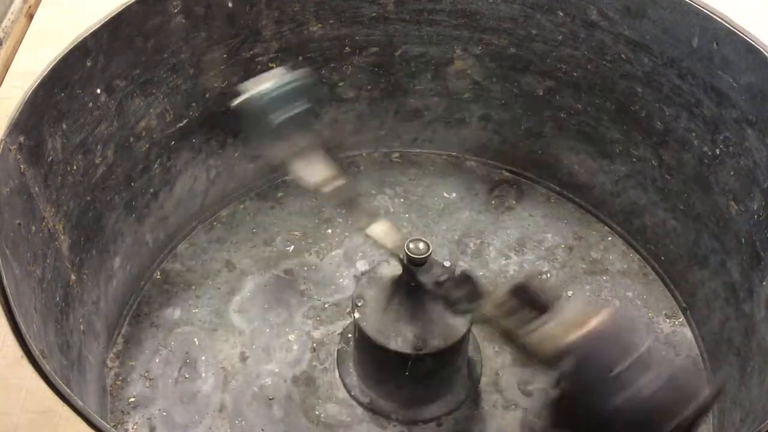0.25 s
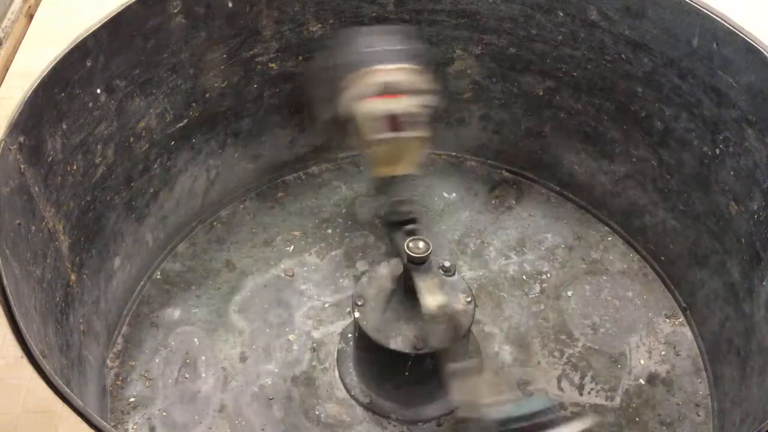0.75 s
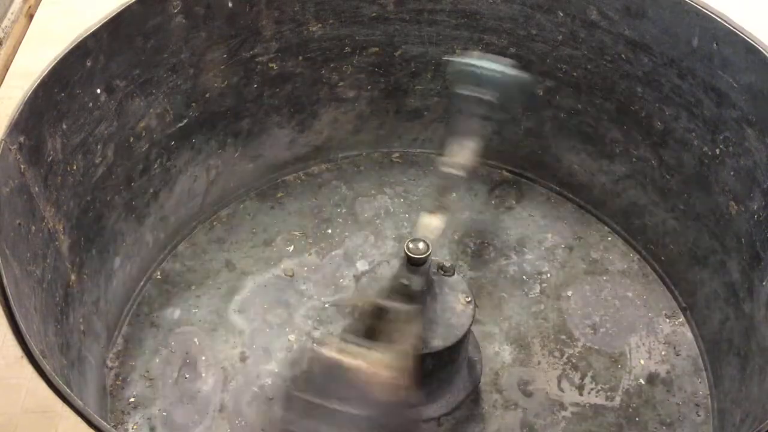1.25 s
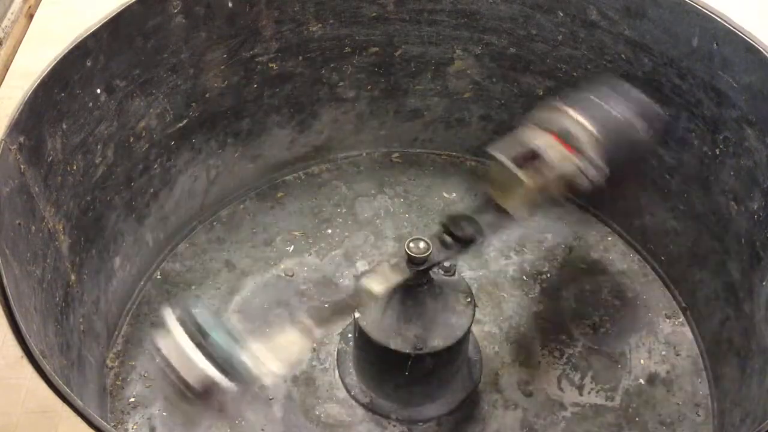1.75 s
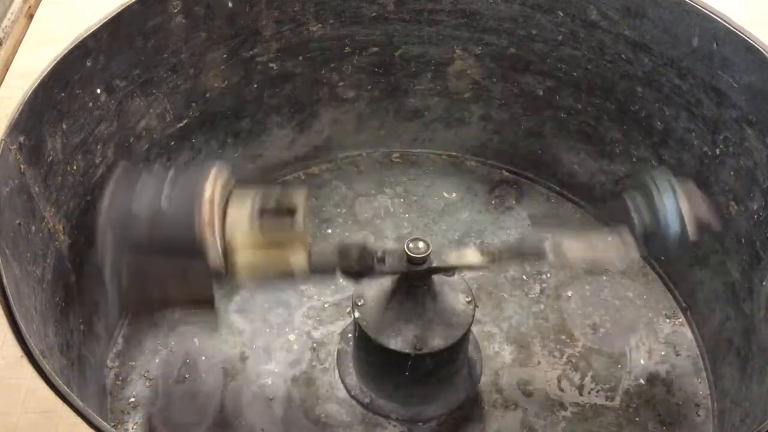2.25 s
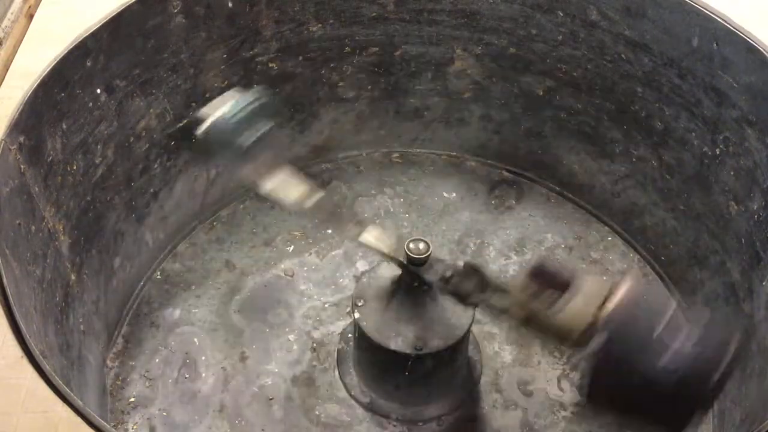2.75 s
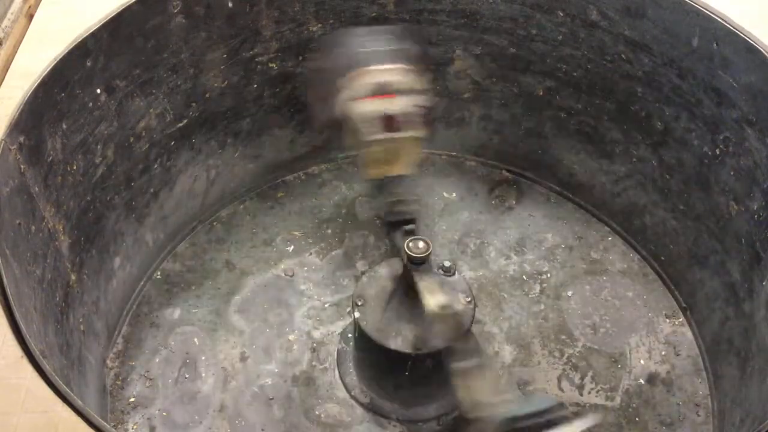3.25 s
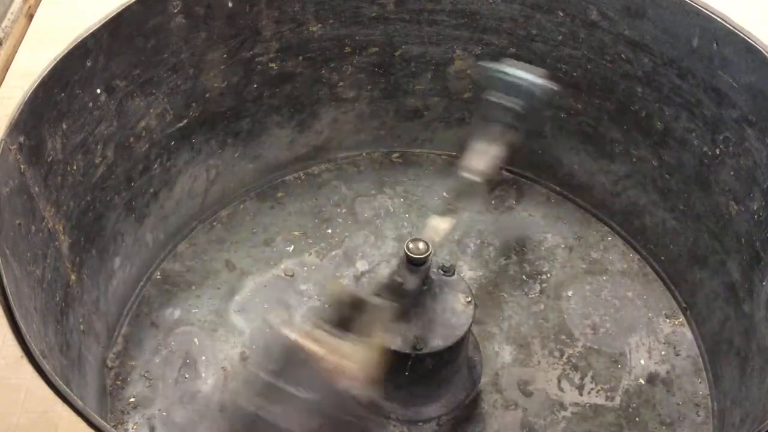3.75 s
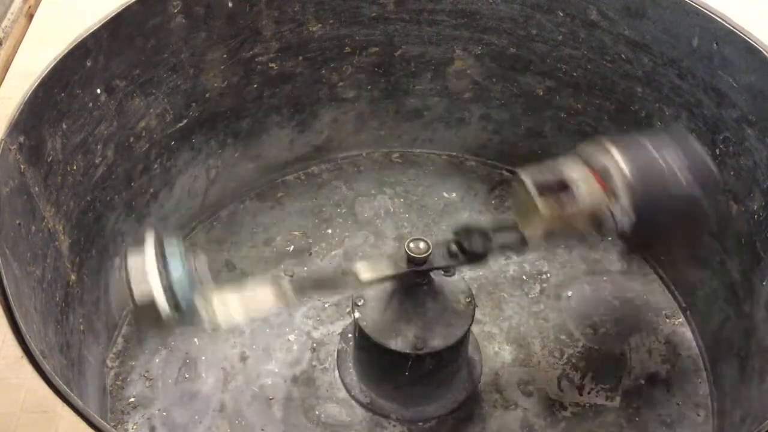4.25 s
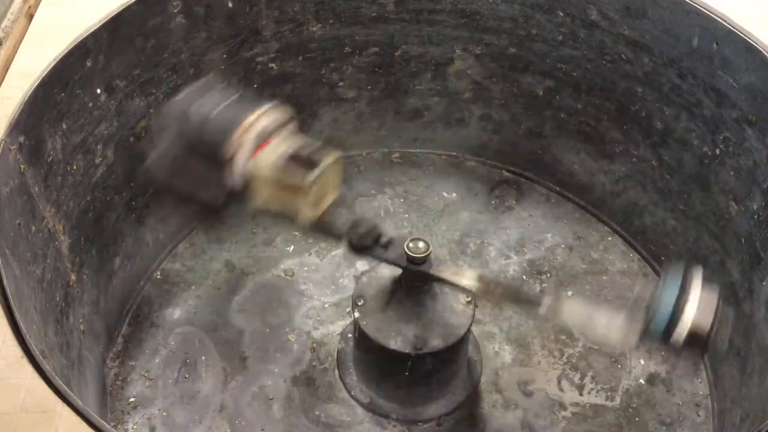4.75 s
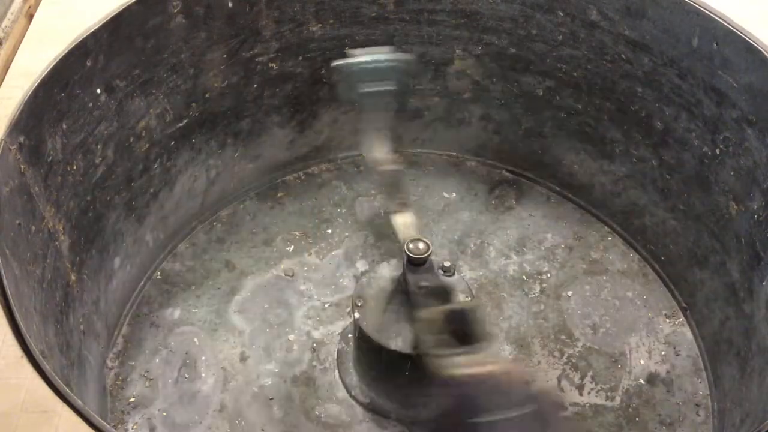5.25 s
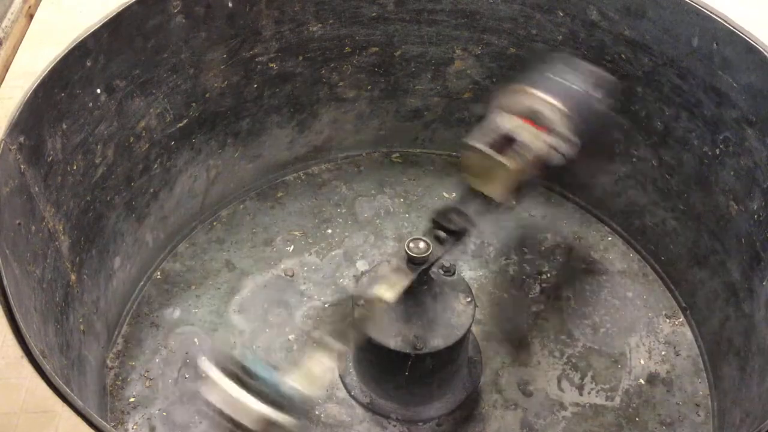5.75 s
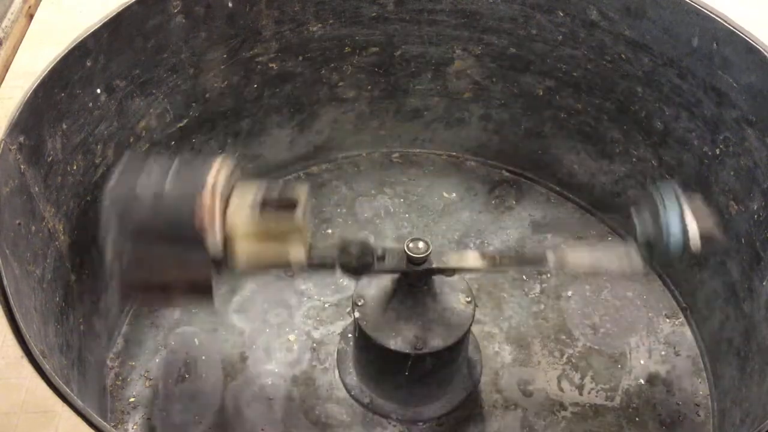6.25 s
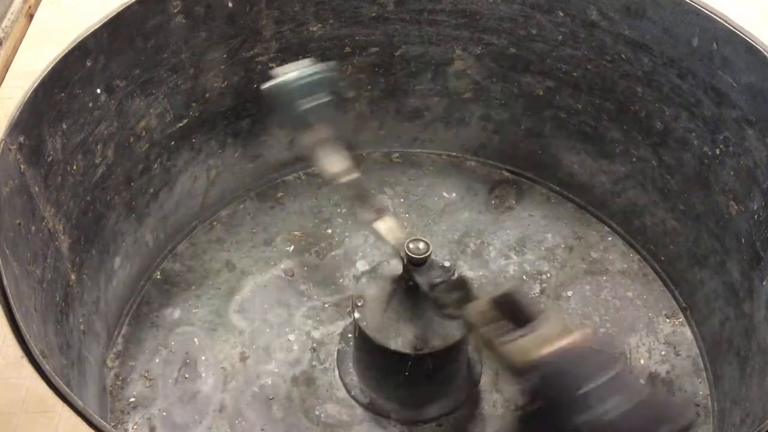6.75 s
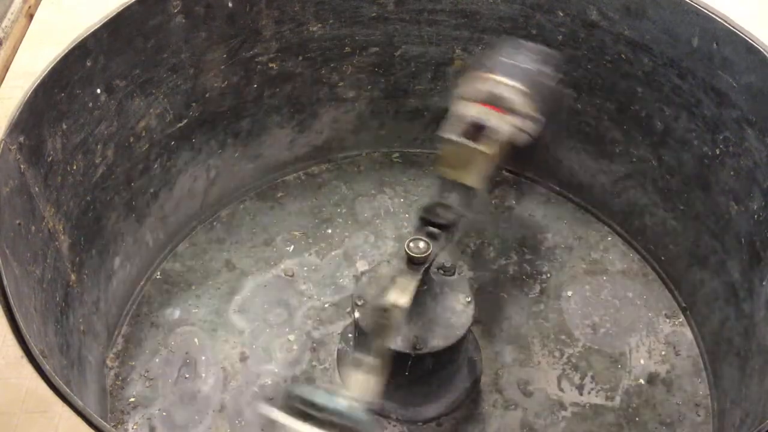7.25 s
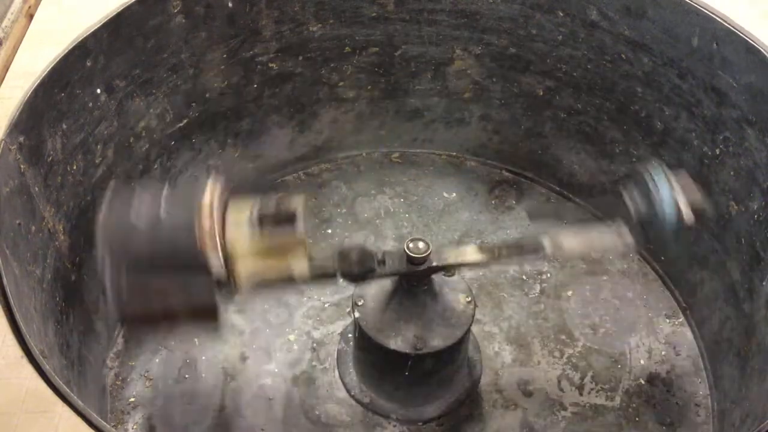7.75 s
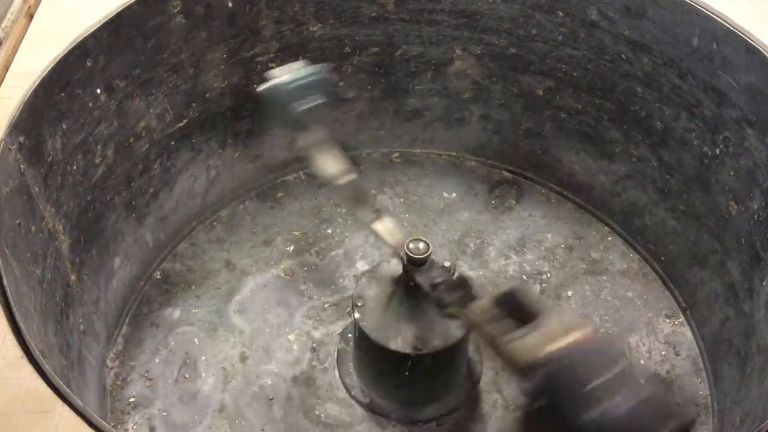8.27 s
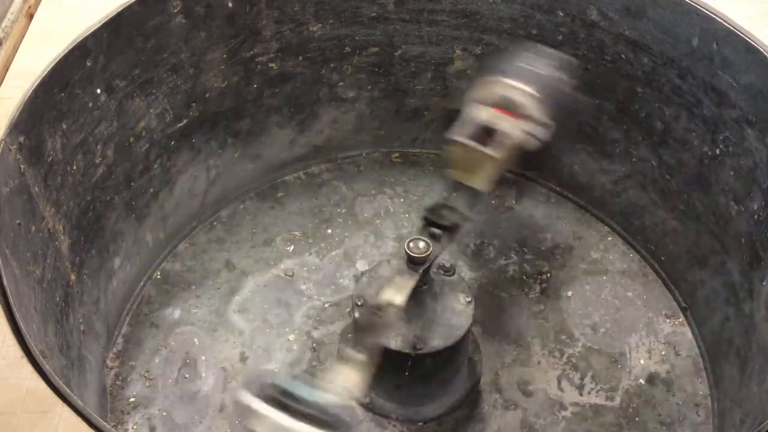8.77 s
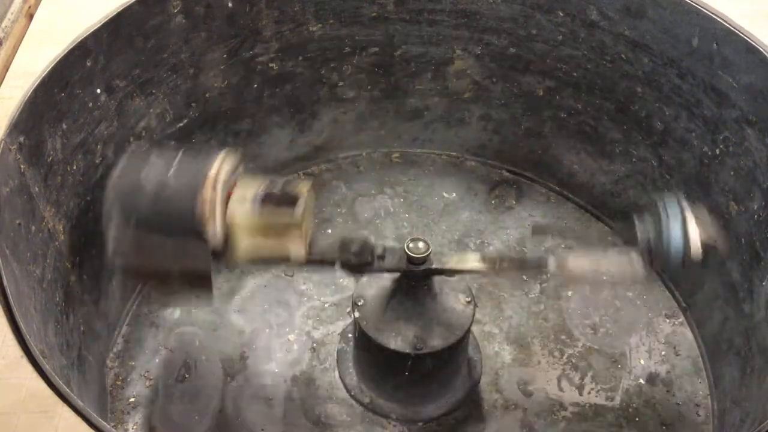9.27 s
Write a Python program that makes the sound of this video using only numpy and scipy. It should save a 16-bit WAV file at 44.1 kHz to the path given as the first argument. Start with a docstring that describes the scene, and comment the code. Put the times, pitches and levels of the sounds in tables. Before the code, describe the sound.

A steady low extractor-fan rumble with airy rush fills a workshop while a spinning metal arm gives faint, crisp double ticks about three times a second.

```python
"""The arm of a centrifugal casting machine coasts round inside a steel drum, slowing from about 3.4 to 2.6 turns
a second; on every turn its loose joint ticks: filtered noise bursts, decaying arm modes and a short drum wash.
Across the workshop an extractor fan rumbles, rushes and hums: shaped noise, narrow noise bands and sine lines.
Small metal parts ping now and then as decaying sines, over a scatter of faint short treble tones; soft swells
of grainy treble noise come and go. Everything reaches one microphone, with a faint hiss."""
import sys
import numpy as np
from scipy import signal
from scipy.fft import rfft, irfft, next_fast_len
from scipy.io import wavfile
from scipy.ndimage import uniform_filter1d, map_coordinates

SR = 44100
rng = np.random.default_rng(int(sys.argv[2]) if len(sys.argv) > 2 else 0)


def pcm_store(signal):
    """Save signal as 16-bit PCM."""
    levels = np.round(np.clip(np.atleast_2d(signal), -1, 1) * 32767)
    wavfile.write(sys.argv[1], SR, levels.astype(np.int16).T)


N = 419391  # samples

# Extractor rumble spectrum: (frequency [Hz], relative density [dB per Hz])
RUMBLE_SPECTRUM = [(13, -56), (22, -26), (80, -5), (96, -1.5), (108, 0.5), (119, 2), (130, -2), (152, -9.5),
                   (166, -12), (212, -15), (229, -20.5), (248, -15), (270, -19.5), (326, -23.5),
                   (343, -28.5), (365, -22), (392, -28.5), (410, -29.5), (476, -26.5), (560, -43.5),
                   (730, -68.5), (1230, -120)]
# Slow level curve of the rumble noise, uneven by a few dB: (time [s], rms level [dB])
RUMBLE_LEVEL = [(0, -34.5), (.7, -32.5), (1.3, -32), (2.2, -34.5), (2.9, -32), (3.4, -32), (4.2, -32),
                (4.7, -34), (5.2, -33.5), (5.7, -33), (6.2, -32.5), (7.5, -33.5), (8.5, -32.5), (9.5, -35)]
# Extractor air rush spectrum: (frequency [Hz], relative density [dB per Hz])
RUSH_SPECTRUM = [(320, -34.5), (540, -5.5), (616, -0.5), (812, -4), (957, -4), (1080, -7), (1410, -3),
                 (1590, -9.5), (1750, -8.5), (1920, -12.5), (2140, -12.5), (2330, -14.5), (2550, -16),
                 (2910, -19), (4500, -29), (7500, -41), (9750, -68.5), (16500, -120)]
RUSH_DB = -56  # rms
# Narrow noise bands that give the rush a wavering, tonal grain:
# (frequency [Hz], width of one pass [Hz], rms level [dB])
TONAL_BANDS = [(96.6, 5.2, -45), (202.3, 21, -52), (286, 8.4, -61.5), (330.5, 8, -67), (433, 17, -66.5),
               (477.7, 16, -65.5), (513.5, 14, -72.5), (602, 6, -70), (620.8, 14, -69.5), (658, 8.4, -73),
               (757.5, 28, -71.5), (913, 11, -72), (972, 28, -70.5), (1045, 18, -70.5), (1149, 64, -69.5),
               (1396, 33, -76), (1480, 110, -76), (1720, 170, -77), (2034, 46, -79), (2140, 28, -78.5),
               (2488, 55, -78.5), (2630, 40, -82), (3220, 380, -84)]
DRIFT_S = .004  # spread of the time wander that makes these bands waver in pitch
# Motor lines, shaft orders and mains hum: (frequency [Hz], rms level before HUM_TRIM_DB [dB])
HUM_LINES = [(34, -62.5), (68, -49.5), (120, -44.5), (240, -52), (360, -60), (480, -74), (877.1, -74.5)]
HUM_TRIM_DB = -0.5

# Microphone hiss spectrum: (frequency [Hz], relative density [dB per Hz])
HISS_SPECTRUM = [(3820, -30), (6500, -5), (7690, -3.5), (9240, -1), (12600, -7.5), (14500, -7.5),
                 (15600, -19)]
HISS_DB = -87  # rms
TOP_HZ = 15680  # upper limit of the recorder

# The joint clicks twice on each turn, a duller click and then a brighter one:
# (time [s], nominal peak [dB], gap to second [s], second nominal peak [dB], knock relative to click [dB])
TURN_CLICKS = [(0.187, -64, .012, -70, -14), (0.4748, -63, .014, -66, -7), (0.7662, -66, .019, -63, -7),
               (1.065, -64.5, 0.022, -67, -2), (1.3734, -67, .015, -65, -14),
               (1.6794, -69, 0.011, -64, -13.5), (1.9854, -67, .020, -64, -6),
               (2.2942, -65, 0.024, -64, -3), (2.6204, -67, 0.013, -71, -13),
               (2.9377, -65.5, .014, -67, -9), (3.2525, -67.5, 0.021, -66, 1),
               (3.5733, -68, 0.021, -65, -5), (3.9114, -66, .011, -68, -11), (4.2438, -65, .013, -68, -12),
               (4.573, -67, .016, -72, -5.5), (4.9092, -64, 0.021, -64, -4), (5.253, -69, 0.017, -64, -8),
               (5.6077, -65, .013, -65, -10), (5.9474, -67, 0.018, -70, 0), (6.3011, -68, 0.026, -67, -3),
               (6.6363, -65, .038, -67, -9), (7.0354, -64, .012, -68, -14), (7.3971, -66, 0.02, -64, -5),
               (7.7677, -66.5, 0.02, -64, -11), (8.153, -59.5, 0.018, -57, 7.5),
               (8.5395, -66, .012, -72, -10), (8.9171, -67, 0.018, -64, -4.5),
               (9.3097, -64, 0.025, -64, -7)]
FIRST_HZ, SECOND_HZ = 12300, 14600  # bright centres; the first is scattered by up to an eighth
SECOND_KNOCK_DB = -3  # the second knock relative to the first
# A faint third click after some turns; its delay is scattered by half either way
REBOUND_S, REBOUND_DB, REBOUND_KNOCK_DB, REBOUND_CHANCE = .06, -72, -14.5, .25
# Extra knocks, some on a turn's tick and some between turns:
# (time [s], nominal peak [dB], knock relative to click [dB], bright centre [Hz])
EXTRA_KNOCKS = [(1.1258, -65, -11, 11500), (1.3475, -54.5, -17, 14600), (2.147, -76, -8, 12000),
                (2.179, -64.5, 4, 9000), (2.186, -69, 3, 11500), (3.315, -70, -8, 8800),
                (4.99, -71, -7, 9700), (8.171, -55, -12, 9200)]
# Modes of the arm and its cradle: (frequency [Hz], relative level [dB], t60 [s])
ARM_MODES = [(3960, -3.5, .07), (4380, 0, 0.072), (4830, 0, 0.07), (5200, -1.5, .04), (5570, -2, .05),
             (6200, -3, .14), (6900, -5.5, .04), (7960, -6, .05), (9000, -5, .12), (9400, -8, .05),
             (10300, -8, .04), (11000, -9, .05)]
CLICK_T60_S, TAIL_T60_S, TAIL_DB = .03, .22, -14.5  # a short core, then a faint noisy tail
LEAD_IN_S, LEAD_IN_DB = .005, -13.5  # a short soft rise of noise before each click
BODY_DB, BODY_LOW_HZ = -7, 5500  # a broad crack under the bright scrape, relative to it
GRIT_MODES = 10  # small bright modes per blow
WASH_DB = -60.5

# Small metal pings: (time [s], level before rise and damping [dB], frequency [Hz], t60 before damping [s])
METAL_PINGS = [(.238, -77, 11600, .1), (1.887, -67, 6220, 0.084), (2.06, -77, 4250, .25),
               (2.84, -77, 12900, .12), (3.964, -69, 11571, 0.5), (3.968, -83, 10700, .3),
               (3.975, -81, 9000, .12), (3.993, -80, 12890, .4), (3.992, -80, 12400, .04),
               (4.003, -76, 12350, .04), (3.993, -86, 13900, .2), (1.135, -85, 13200, .2),
               (2.99, -83, 11400, .15), (3.0, -84, 10400, .12), (4.003, -67, 12800, .08),
               (6.637, -66, 11700, .07), (6.638, -75, 14300, .06), (6.639, -76, 12700, .06),
               (7.494, -79, 8900, .08)]
DAMPED_AT = .3  # share of its t60 after which a pinging part settles and is damped

# Soft treble noise swells, two of them trailing hard ticks: (time of the top [s], level [dB], spread [s])
TREBLE_SWELLS = [(3.02, -83, .07), (3.3, -85, 0.043), (3.55, -89, .1), (5.45, -81, 0.031),
                 (5.97, -79.5, 0.042), (6.13, -81, .03), (7.28, -87, .04), (8.21, -85, .03),
                 (3.3, -89.5, .3), (5.8, -89, .3), (6.68, -83, .025)]
GRAINS_PER_S, GRAIN_T60_S, GRAIN_SCATTER_DB = 1500, .006, 3.


def undb(db):
    """Decibels to gain."""
    return 10 ** (np.asarray(db) / 20)


def level(x, db):
    """Scale to an rms level."""
    return x * undb(db) / np.sqrt(np.mean(x ** 2))


def shaped(gain):
    """Noise of rms 1, white noise weighted by gain(Hz)."""
    size = next_fast_len(N)
    hz = np.arange(1, size // 2 + 2) * SR / size
    spectrum = rfft(rng.standard_normal(size)) * gain(hz)
    return level(irfft(spectrum, size)[:N], 0)


def coloured(points):
    """Noise of rms 1 through a (Hz, dB) table, practically silent outside it."""
    f, db = np.transpose(points)
    return shaped(lambda hz: undb(np.interp(np.log(hz), np.log(f), db, -200, -200)))


def resonant(centre_hz, width_hz):
    """Noise of rms 1 through a resonance applied twice."""
    return shaped(lambda hz: 1 / (1 + ((hz - centre_hz ** 2 / hz) / width_hz) ** 2))


def walk(rate):
    """Random levels held 1 / rate s and slewed twice; spread 1."""
    k = int(SR / rate)
    steps = np.repeat(rng.standard_normal(N // k + 1), k)
    x = uniform_filter1d(uniform_filter1d(steps, k), k)[:N]
    return x / x.std()


def add(out, s, x):
    """Mix x into out from s seconds on."""
    i = int(s * SR)
    out[i:i + len(x)] += x[:N - i]


def decay(t60, rise_s):
    """Envelope with a short rise and an exponential fall of 60 dB in t60 s."""
    t = np.arange(int(max(t60, .01) * SR)) / SR
    return (1 - np.exp(-t / rise_s)) * np.exp(-np.log(1000) * t / t60)


def ring(hz, t60, rise_s):
    """One decaying mode."""
    env = decay(t60, rise_s)
    return np.sqrt(2) * env * np.sin(2 * np.pi * hz * np.arange(len(env)) / SR)


def flutter(x, depth_db, rate):
    """Third-octave bands swell and sink independently; the outermost take in all beyond them."""
    size = next_fast_len(N)
    hz = np.arange(1, size // 2 + 2) * SR / size
    spectrum = rfft(x, size)
    band = np.clip(np.round(3 * np.log2(hz / 1000)), -3, 9)
    return sum(irfft(spectrum * (band == k), size)[:N] * undb(depth_db * walk(rate)) for k in np.unique(band))


def extractor(t):
    """Rumble and air rush as shaped noise, a tonal grain of narrow bands and slightly unsteady motor lines."""
    rumble_db = np.interp(t, *np.transpose(RUMBLE_LEVEL))
    rumble = coloured(RUMBLE_SPECTRUM) * undb(rumble_db + 0.82 * walk(5))
    slow_rush = flutter(coloured(RUSH_SPECTRUM), .6, 8)
    rush = level(flutter(slow_rush, 1.49, 30), RUSH_DB)
    grain = sum(undb(db + 1.5 * walk(5)) * resonant(hz, width) for hz, width, db in TONAL_BANDS)
    # reading the bands at wandering times bends their pitch
    grain = map_coordinates(grain, [(t + DRIFT_S * walk(1.5)) * SR], order=1, mode="mirror")
    hum = np.zeros(N)
    for hz, db in HUM_LINES:
        gain = undb(db + HUM_TRIM_DB + 1.6 * walk(6))
        hum += gain * np.sqrt(2) * np.sin(2 * np.pi * hz * t + .5 * walk(6))
    return rumble + rush + grain + hum


def microphone_hiss():
    """Steady treble noise with a slight level wander."""
    return level(coloured(HISS_SPECTRUM) * undb(.5 * walk(6)), HISS_DB)


def clicks():
    """Every blow on the arm as (s, nominal peak dB, knock relative dB, bright centre Hz)."""
    rows = list(EXTRA_KNOCKS)
    for s, db, gap, second_db, knock_db in TURN_CLICKS:
        pitch, chance, delay = rng.random(3)
        rows.append((s, db, knock_db, FIRST_HZ * (1 + .25 * (pitch - .5))))
        rows.append((s + gap, second_db, knock_db + SECOND_KNOCK_DB, SECOND_HZ))
        if chance < REBOUND_CHANCE:
            third_s = s + gap + REBOUND_S * (.5 + delay)
            rows.append((third_s, REBOUND_DB, REBOUND_KNOCK_DB, 0.69 * FIRST_HZ))
    return rows


def scrape_envelope():
    """A soft rise, then a fast-falling click with a faint tail; also gives the samples before the click."""
    env = undb(TAIL_DB) * decay(TAIL_T60_S, .006)
    add(env, 0, decay(CLICK_T60_S, 0.002))
    # continues the lead-in level into the click
    add(env, 0, undb(LEAD_IN_DB) * decay(CLICK_T60_S, 1e-6))
    lead = np.exp(-np.arange(int(4 * LEAD_IN_S * SR))[::-1] / (LEAD_IN_S * SR))
    return np.concatenate([undb(LEAD_IN_DB) * lead, env]), len(lead)


def bright_grit(hz):
    """Band noise of rms 1 around the bright centre, for the scrape."""
    edges = np.clip([.86 * hz, 1.13 * hz], 100, .45 * SR)
    sos = signal.butter(2, edges, "band", fs=SR, output="sos")
    return level(signal.sosfilt(sos, rng.standard_normal(16384)), 0)


def joint():
    """Each tick is a bright gritty scrape, a dull knock and the ring of the arm; the drum adds a short wash."""
    out, blows = np.zeros(N), np.zeros(N)
    knock = resonant(4900, 2400)
    body = undb(BODY_DB) * shaped(lambda hz: 1 / (1 + (BODY_LOW_HZ / hz) ** 4))
    env, lead_samples = scrape_envelope()
    for s, db, dull_db, hz in clicks():
        i = int(s * SR)
        span = slice(i, i + len(env))
        # resize fills up a stretch that runs past the end
        under = np.resize(undb(dull_db) * knock[span] + body[span], len(env))
        noise = bright_grit(hz)[:len(env)] + under
        # noise peaks stand about 6 dB over the rms
        add(out, s - lead_samples / SR, undb(db - 5.5) * env * noise)
        # every blow lands differently, so the modes get new weights and slightly new pitches
        for mode_hz, mode_db, mode_t60 in ARM_MODES:
            weight, bend = rng.standard_normal(2)
            gain = undb(db + dull_db + mode_db - 13.5 + 2.6 * weight)
            add(out, s, gain * ring(mode_hz * (1 + 0.025 * bend), mode_t60, 0.0015))
        # small bright modes of the joint, new ones at every blow
        for drop, pitch, delay in rng.random((GRIT_MODES, 3)):
            grit_ring = ring(hz * (.76 + .32 * pitch), 0.041, .002)
            add(out, s + 0.0036 * delay, undb(db - 14.0 - 10 * drop) * grit_ring)
        # the small exponent nearly evens out how strongly blows feed the wash
        add(blows, s, undb([db + dull_db]) ** 0.19)
    wash = signal.fftconvolve(blows, decay(0.2, 0.0022))[:N]
    return out + undb(WASH_DB) * wash * undb(1.5 * walk(60)) * resonant(3000, 1600)


def pings():
    """Single high modes of small struck metal parts, over a scatter of faint short random treble tones."""
    out = np.zeros(N)
    for s, db, hz, t60 in METAL_PINGS:
        damping = np.exp(-(np.linspace(0, 1, int(t60 * SR)) / DAMPED_AT) ** 4)
        add(out, s, undb(db) * ring(hz, t60, .003) * damping)
    for when, pitch, size in rng.random((150, 3)):
        hz = 2500 * 4.5 ** pitch
        add(out, when * N / SR, undb(-78 - 12 * pitch - 8 * size) * ring(hz, .09, .004))
    return out


def treble_swells(t):
    """Soft swells of treble noise, roughened by dense, uneven grains."""
    swell = sum(undb(db) * np.exp(-.5 * ((t - s) / spread) ** 2) for s, db, spread in TREBLE_SWELLS)
    starts = rng.random(N) < GRAINS_PER_S / SR
    grains = starts * undb(GRAIN_SCATTER_DB * rng.exponential(size=N))
    patter = level(signal.fftconvolve(grains, decay(GRAIN_T60_S, .001))[:N], 0)
    return swell * (.7 + .4 * patter) * resonant(11500, 12000)


def scene():
    """All sources at one microphone."""
    t = np.arange(N) / SR
    return (extractor(t) + microphone_hiss() + joint() + pings() + treble_swells(t))[None]


def record(dry):
    """The microphone drops the deepest bass; the recorder cuts the top and stops without a click."""
    miked = signal.sosfilt(signal.butter(4, 29, "high", fs=SR, output="sos"), dry)
    top_cut = signal.ellip(10, .2, 80, TOP_HZ, fs=SR, output="sos")
    stop = np.minimum(np.arange(N)[::-1] / (.004 * SR), 1)  # 4 ms fade at the end
    return stop * signal.sosfilt(top_cut, miked)


dry = scene()
out = record(dry)
pcm_store(out)
```